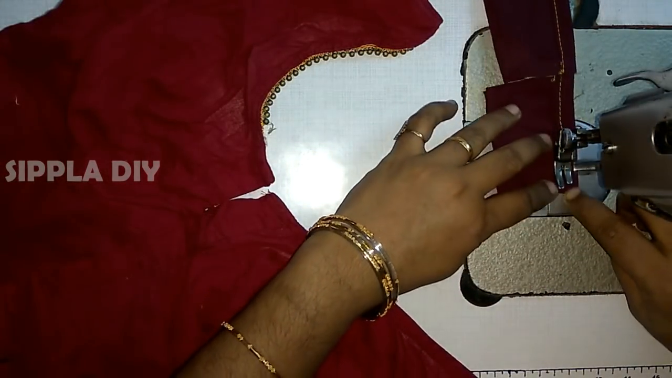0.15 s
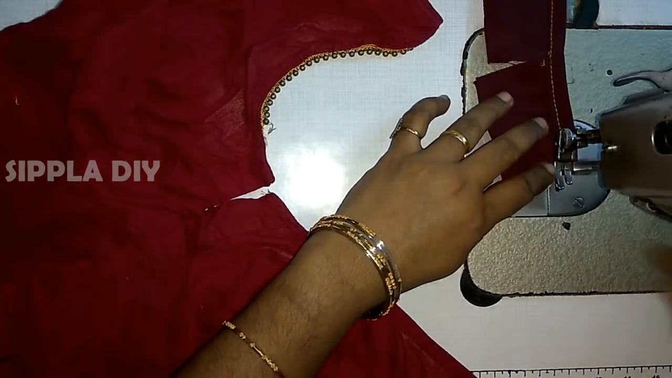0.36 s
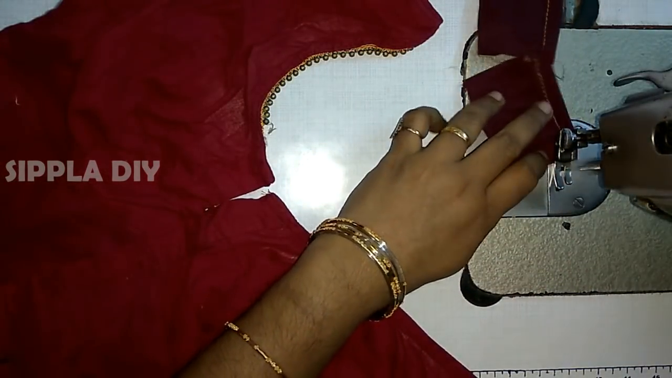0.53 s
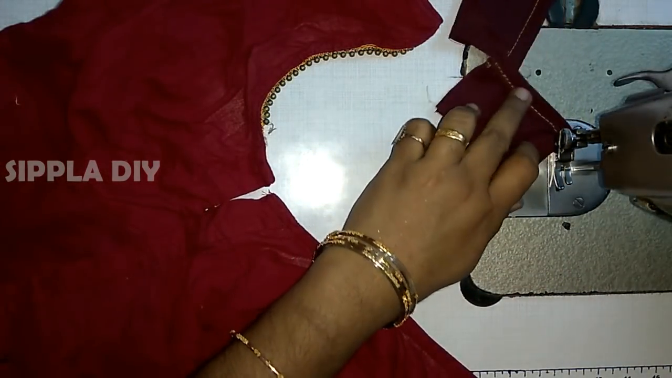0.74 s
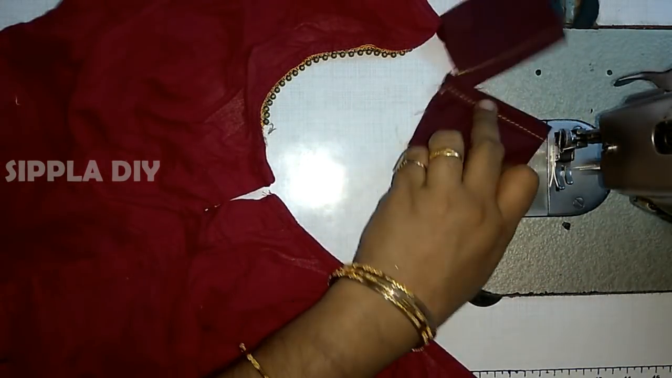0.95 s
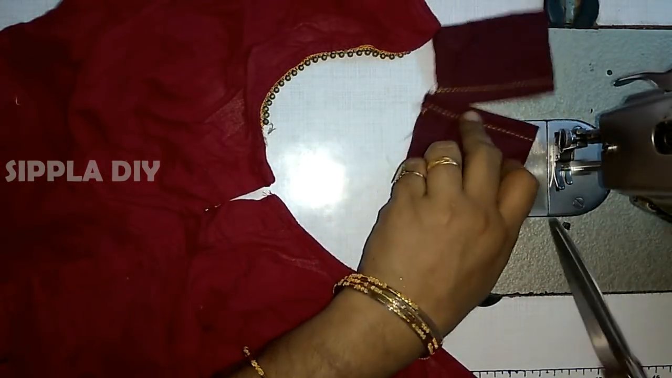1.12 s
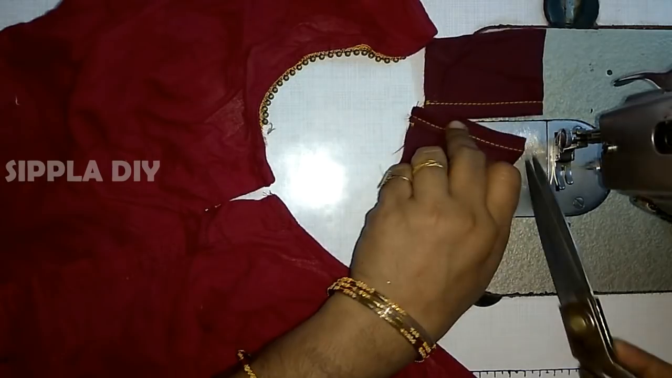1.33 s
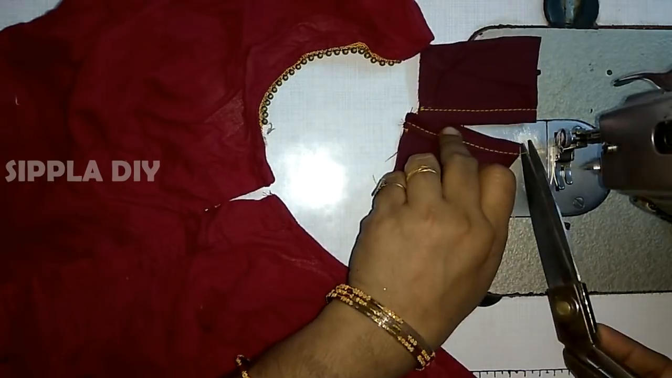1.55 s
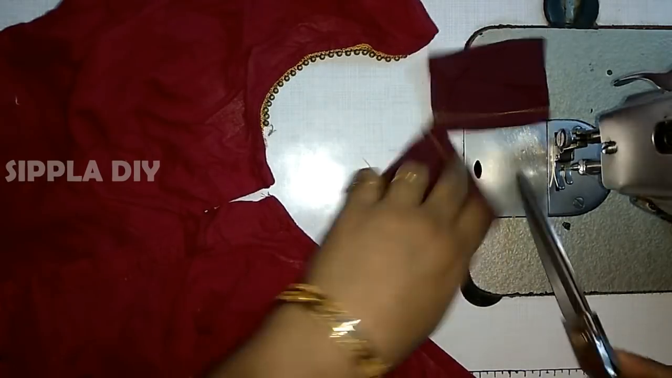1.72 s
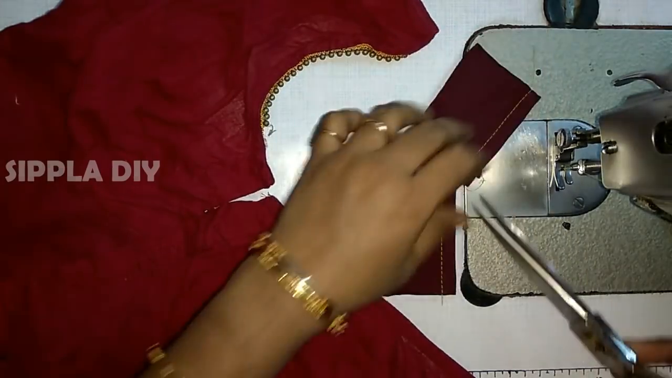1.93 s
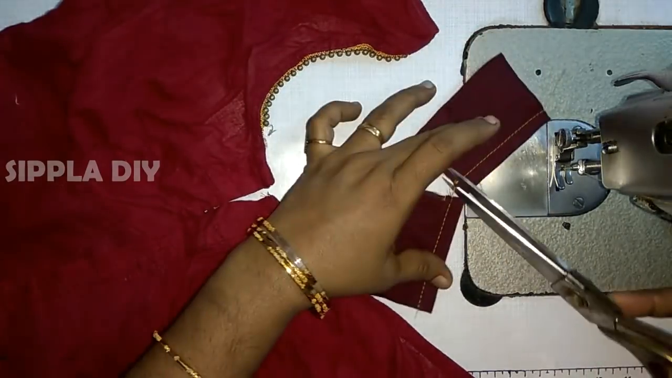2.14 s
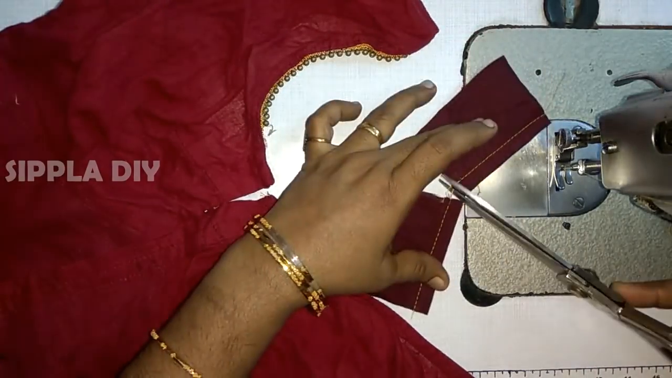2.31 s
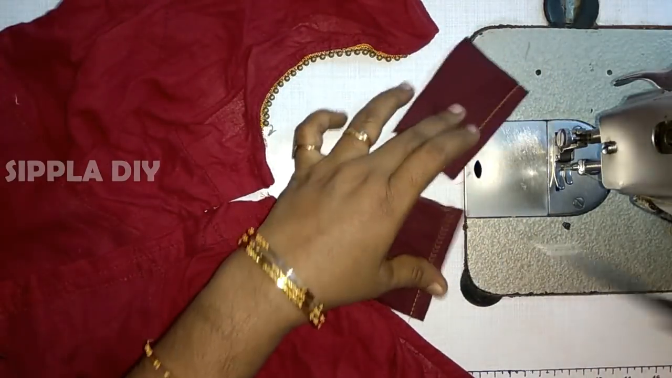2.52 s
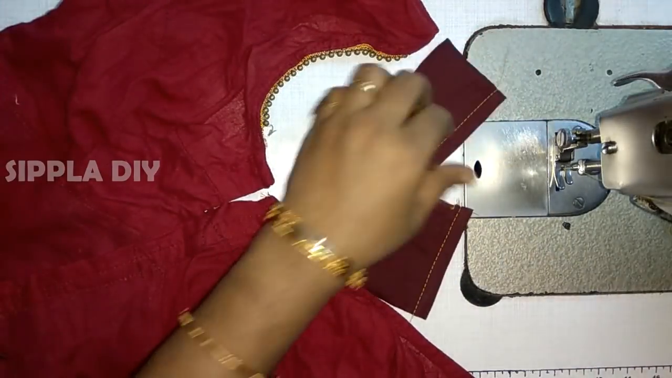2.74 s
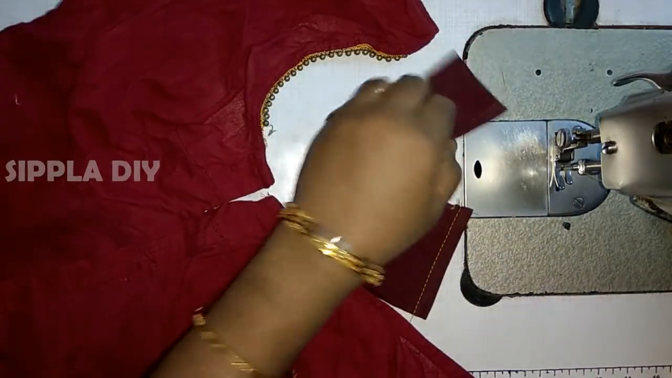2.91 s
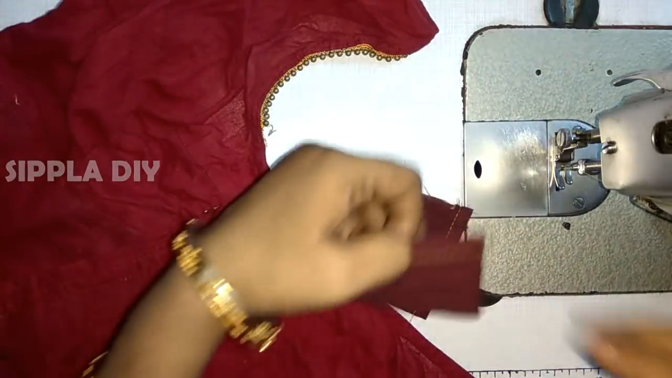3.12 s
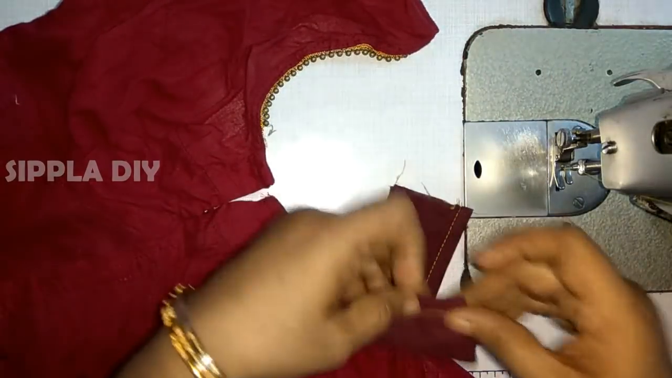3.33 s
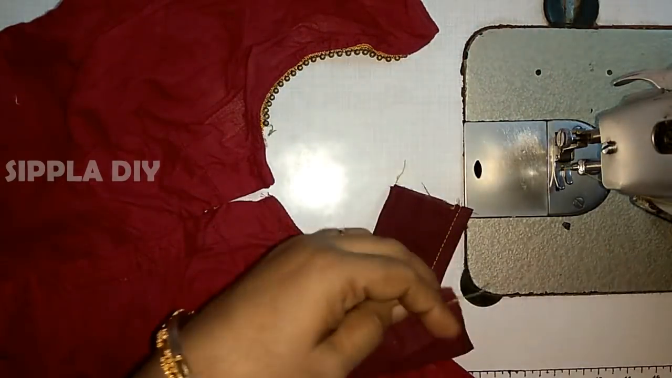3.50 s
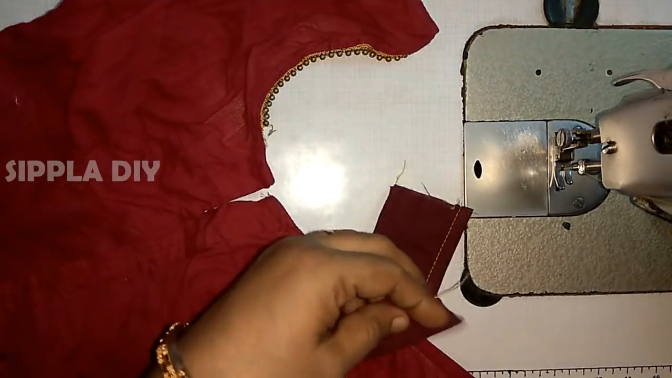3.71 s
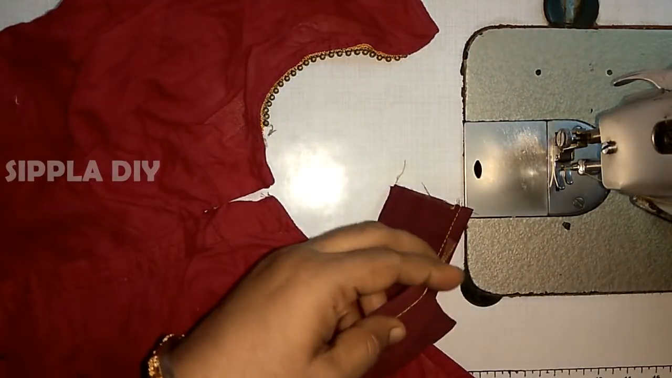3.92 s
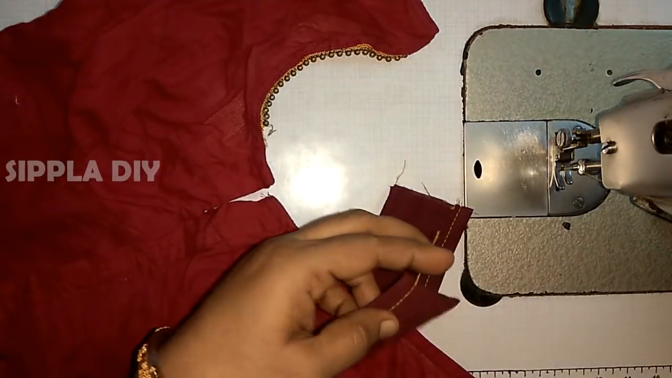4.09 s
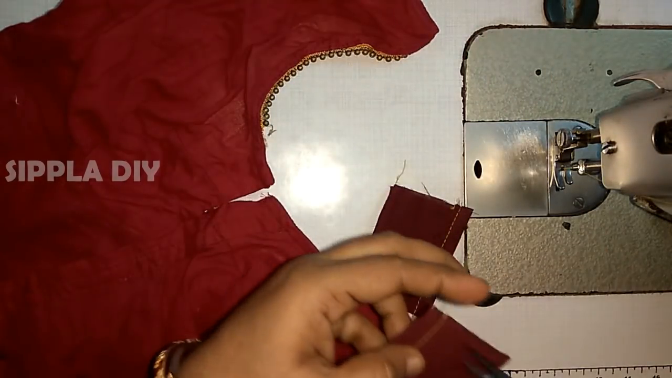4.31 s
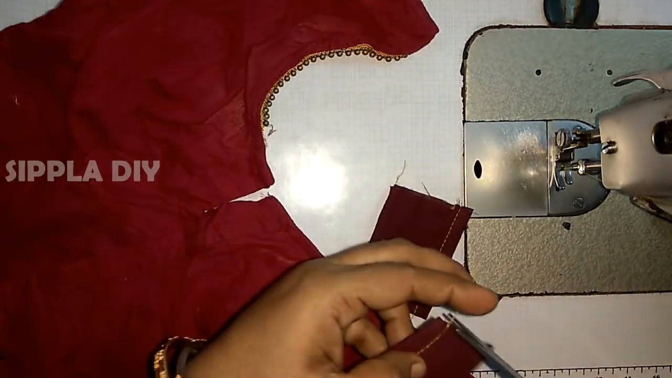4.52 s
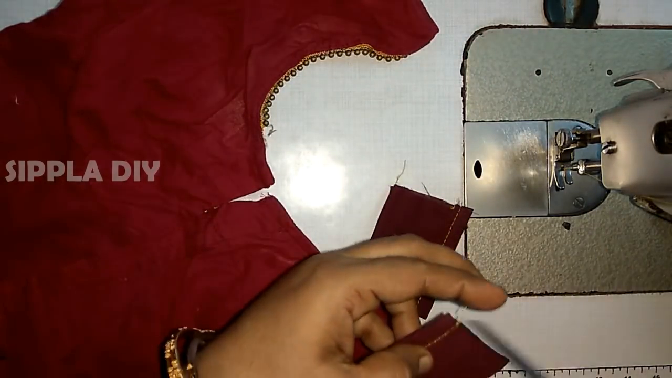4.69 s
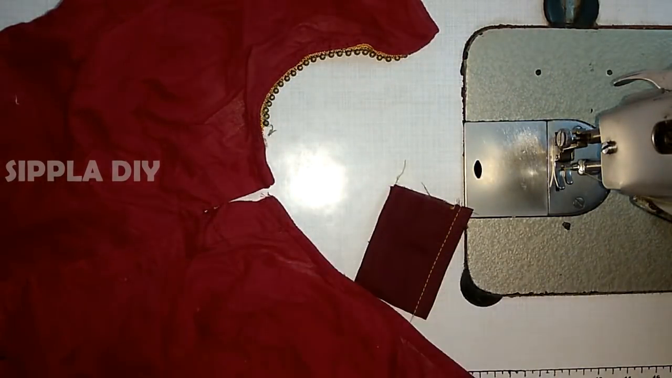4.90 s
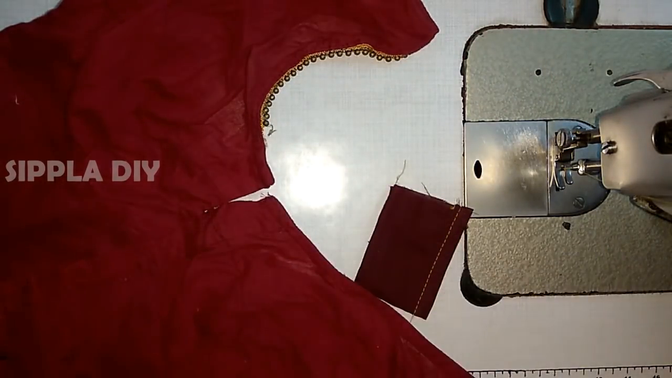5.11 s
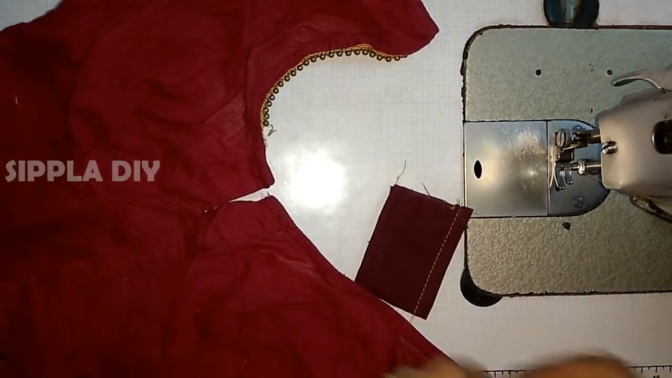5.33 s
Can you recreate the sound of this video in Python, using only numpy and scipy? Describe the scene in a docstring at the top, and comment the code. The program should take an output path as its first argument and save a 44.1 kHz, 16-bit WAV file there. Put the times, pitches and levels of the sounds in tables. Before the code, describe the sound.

A sewing machine clatters through a fast seam, slows and stops, then scissors and hands knock and snip in a small quiet room.

```python
"""A sewing machine on a wooden table runs a seam, slows and stops: hook, needle bar and feed dog clack
in bursts of steel-coloured noise and frame modes, low tones thump the table, and shaft whir runs under.
Blades and cloth slide (grainy noise), scissors and hands knock (noise and modes), a thin whistle sounds
(wavering tone) and scissors snip (ticks and ringing tones), over room tone (murmur and hiss).
A small room answers; the sound is phone-like, little above 7 kHz, its noise unrelated left to right."""
import sys
import numpy as np
from scipy import signal
from scipy.fft import rfft, irfft, next_fast_len
from scipy.io import wavfile
from scipy.ndimage import uniform_filter1d, map_coordinates

SR = 44100
rng = np.random.default_rng(int(sys.argv[2]) if len(sys.argv) > 2 else 0)


def write(x):
    x = np.atleast_2d(x).T
    wavfile.write(sys.argv[1], SR, np.round(np.clip(x, -1, 1) * 32767).astype(np.int16))


N = 240520
T = np.arange(N) / SR
MIRROR_HZ = 8000  # treble just under this comes back mirrored above it

# stitches, timed by the needle bar: needle_s, clack_db (contacts follow it in part), thump_db
STITCHES = [(.0034, -18.5, -29), (0.057, -16, -14), (0.1166, -22, -17), (0.1685, -21.5, -11.5),
            (0.2287, -17.5, -11.5), (0.2894, -20, -13.5), (0.3485, -23, -16), (0.4016, -21, -21),
            (.457, -19, -11.5), (0.513, -18.5, -15.5), (0.573, -22.5, -9.5), (.63, -19, -36),
            (0.6933, -21, -20), (0.755, -21.5, -13.5), (0.811, -19, -24), (0.8668, -23.5, -34),
            (0.908, -33.5, -29), (0.965, -47.5, -17), (1.0395, -23, -13), (1.1096, -21, -16),
            (1.184, -28, -17.5), (1.25, -24.5, -12), (1.318, -27, -12), (1.3935, -19.5, -10),
            (1.483, -25, -27), (1.5807, -21.5, -21), (1.6907, -35.5, -28)]
# state of the run: time_s, steel_whir_db, table_whir_db, clack_body_db, feed_dog_wait_s,
# rebound_db (re thump), hook_lead_s, hook_firmness_db
RUN = [(0, -31.5, -31, -27, 0.025, -23, 0.011, -19), (.3, -32.5, -33, -23, 0.03, -15.5, 0.022, -9.5),
       (.5, -34, -33, -24, 0.029, -13, 0.016, -7), (0.718, -37, -37, -26, 0.025, -5, 0.028, 3.5),
       (0.848, -40.5, -27, -24, 0.025, 12, .016, 6), (1.0, -43, -35, -25, 0.026, 0, 0.011, 1),
       (1.099, -48, -36, -26, .024, 7, 0.02, -3.5), (1.17, -36.5, -33, -26, 0.022, 0.5, 0.012, 6.5),
       (1.321, -40, -36.5, -26, 0.024, -1.5, 0.013, 5), (1.39, -44.5, -40, -30, 0.026, -0.5, 0.013, -2),
       (1.579, -39, -49, -30.5, .036, -1, 0.0052, -14), (1.698, -45.5, -58.5, -36, 0.026, 1, .012, -12.5),
       (1.9, -60, -77, 2, .028, -8, .012, -14)]


def amp(db):
    """Amplitude factor of a level in dB."""
    return 10 ** (np.asarray(db) / 20)


def unit(x):
    """x scaled to rms 1."""
    return x / np.sqrt(np.mean(x ** 2) + 1e-20)


def along(points, hz):
    """Interpolate (Hz, value) points on a log frequency axis."""
    f, v = np.transpose(points)
    return np.interp(np.log(hz + 1), np.log(f + 1), v)


def curves(rows):
    """One value per sample for each column after the time."""
    s, *cols = np.transpose(rows)
    return [np.interp(T, s, c) for c in cols]


def sounding(rows):
    """A gate that opens and closes softly at the ends of a table."""
    return np.clip(np.minimum(T - rows[0][0], rows[-1][0] - T) / 0.013, 0, 1)


def run_state(column, s):
    """One column of the run's state at given times."""
    rows = np.transpose(RUN)
    return np.interp(s, rows[0], rows[column])


def wobble(rate_hz):
    """A smooth random curve, rate_hz knots a second."""
    knots = rng.standard_normal(int(N * rate_hz / SR) + 4)
    return map_coordinates(knots, [T * rate_hz])


def filtered(x, response):
    """x filtered by a response given as a function of frequency."""
    m = next_fast_len(N + SR // 2)
    return irfft(rfft(x, m) * response(np.fft.rfftfreq(m, 1 / SR)), m)[..., :N]


def split(x, hz):
    """The parts of x below and above a frequency."""
    low = filtered(x, lambda f: 1 / (1 + (f / hz) ** 8))
    return low, x - low


def noise(spectrum, level=1, patchy_db=0, span=3):
    """Coloured noise, unrelated left to right; its colour shifts in patches of span x 1.5 ms."""
    z = signal.stft(rng.standard_normal((2, N)), nperseg=128)[2]
    field = uniform_filter1d(rng.standard_normal(z.shape[1:]), size=2, axis=0)
    field = uniform_filter1d(field, size=span, axis=1)
    patchy = unit(signal.istft(z * amp(patchy_db * unit(field)), nperseg=128)[1][:, :N])
    return filtered(level * patchy, lambda hz: unit(amp(along(spectrum, hz)) * (hz < MIRROR_HZ)))


def wood(f):
    """The table's resonances, scaled so that white noise keeps its power."""
    # centre_hz, width_hz, relative_level_db
    resonances = [(60, 410, -18), (181, 125, -2.5), (323.7, 72, 3), (394.4, 93, 0.5), (541.5, 74.5, 0.5),
                  (697, 130, -7.5)]
    r = 0
    for k, (c, w, db) in enumerate(resonances):
        r = r + (-1) ** k * amp(db) * 1j * f * w / (c * c - f * f + 1j * f * w)
    return r / np.sqrt(np.mean(np.abs(r) ** 2))


def shaken_table(level):
    """White noise under an envelope, unrelated left to right, through the table's resonances."""
    return filtered(level * rng.standard_normal((2, N)), wood)


def burst(s, rise_s, t60_s):
    """Power of one contact: a bell-shaped rise, then an exponential fall."""
    u = T - s
    return np.where(u < 0, np.exp(-(u / rise_s) ** 2), amp(-120 * np.abs(u) / t60_s))


def train(times, db, rise_s, t60_s):
    """Amplitude envelope of many alike contacts whose powers add, each peaking 0.4 ms after its time."""
    spikes = np.bincount(np.round(np.asarray(times) * SR).astype(int), amp(2 * np.asarray(db)), N)
    shape = burst(0.0504, rise_s, t60_s)[:SR // 4]
    power = signal.fftconvolve(spikes, shape)[round(.05 * SR):][:N]
    return np.sqrt(np.abs(power))


def ring(modes, times, db, scatter_db, attack_s):
    """Each blow rings the modes at a new pitch and balance, with a new phase in each channel."""
    out, t = np.zeros((2, N + SR)), T[:SR // 5]
    hz, mode_db, t60_s = np.transpose(modes)[..., None, None]
    onset = 1 - np.exp(-t / attack_s)
    for s, level_db in zip(times, db):
        chance = rng.standard_normal((len(modes), 1, 2))
        pitch_hz = hz * (1 + .008 * chance[..., :1])
        decay = amp(mode_db + scatter_db * chance[..., 1:] - 60 * t / t60_s)
        tones = decay * np.sin(2 * np.pi * (pitch_hz * t + rng.random((len(modes), 2, 1))))
        out[:, round(s * SR):][:, :len(t)] += amp(level_db) * tones.sum(axis=0) * onset
    return out[:, :N]


def contacts():
    """Time, treble level and body level of hook, needle bar and feed dog in every stitch."""
    # one value each for hook, needle bar, feed dog: treble_db at average strength
    treble_db = [-27, -20, -24]
    # share of the stitch's strength in dB that each follows
    follows = [0.85, 0.77, 0.27]
    # body_offset_db
    body_offset_db = [-5, 0.5, 2]
    jitter_s, scatter_db = 0.0005, 0.63
    s, clack_db, _ = np.transpose(STITCHES)
    chance = rng.standard_normal((len(s), 3, 3)) * [[1], [.3], [1]]  # needle bar varies least
    offset_s = np.c_[-run_state(column=6, s=s), 0 * s, run_state(column=4, s=s)]
    times = s[:, None] + offset_s + jitter_s * chance[..., 0]
    firm_db = np.c_[run_state(column=7, s=s), 0 * s, 0 * s]
    strength_db = np.outer(clack_db - treble_db[1], follows)
    db = treble_db + firm_db + strength_db + scatter_db * chance[..., 1]
    body_db = run_state(column=3, s=times) + body_offset_db + firm_db + scatter_db * chance[..., 2]
    heard = times > 0
    return times[heard], db[heard], body_db[heard]


def machine():
    """Clacks ring the steel frame, each in its own colour, and shake the table; the whir runs under them."""
    # steel spectrum: frequency_hz, relative_density_db
    steel = [(440, -31), (750, -13.5), (1080, -7.5), (1150, -4), (1230, -11), (1370, -15.5), (1570, -8),
             (2060, -9.5), (2430, -7), (2800, -9.5), (3920, -4.5), (4600, -9.5), (5500, -6), (7000, -17)]
    # modes of arm and bed: pitch_hz, relative_level_db, t60_s
    frame_modes = [(319.4, -0.5, 0.17), (553.7, -4.5, 0.1), (786, -13, 0.039), (1147, -7, .13),
                   (1622, -12, .06), (2270, -12.5, .045), (3680, -11, .035), (5630, -8, .035)]
    frame_db, shake_db = -5.5, -12  # re clack body, re clack treble
    s, db, body_db = contacts()
    stop = np.clip((RUN[-1][0] - T) / 0.044, 0, 1)
    steel_whir, table_whir = stop * amp(curves(RUN)[:2])
    treble = train(s + 0.0024, db, 0.0027, 0.046) + steel_whir
    body = train(s + 0.0026, body_db, 0.0038, 0.065) + steel_whir
    high = split(noise(steel, treble, patchy_db=3.5, span=6), hz=3250)[1]
    deep = split(noise(steel, body, patchy_db=4.5, span=6), hz=3135)[0]
    frame = ring(frame_modes, s, body_db + frame_db, scatter_db=1.5, attack_s=0.0059)
    shake = train(s + 0.0014, db + shake_db, 0.002, 0.039) + table_whir
    return high + deep + frame + shaken_table(shake)


def thumps():
    """Table thumps: decaying low tones of new pitch and phase, a rebound, and a shake of upper modes."""
    # a hand lands on the table: start_s, thump_db
    hand = (4.012, -25)
    lead_s, rebound_s, modes_db = 0.0145, 0.0235, -1  # modes_db re clack body
    out, t = np.zeros((2, N + SR)), T[:SR // 8]
    s, _, db = np.transpose(STITCHES[1:])
    start = s - lead_s
    rebound_db = db + run_state(column=5, s=s)
    blows = [*zip(start, db), *zip(start + rebound_s, rebound_db), hand]
    envelope = (1 - np.exp(-t / 0.0048)) ** 2 * amp(-60 * t / 0.083)
    for at, level_db in blows:
        hz = 158 * np.exp(.1 * rng.standard_normal((2, 1)))
        swing = np.sin(2 * np.pi * (hz * t + rng.random((2, 1))))
        out[:, round(at * SR):][:, :len(t)] += amp(level_db) * swing * envelope
    shake = train(s - .002, run_state(column=3, s=s) + modes_db, 0.0079, 0.069)
    return out[:, :N] + shaken_table(shake)


def room_tone():
    """Low murmur of the house and a thin hiss, both slightly unsteady."""
    # time_s, murmur_db, hiss_db
    levels = [(1.9, -61.5, -67), (2.35, -56.5, -67), (2.8, -54, -63.5), (3.33, -56.5, -63),
              (3.7, -61.5, -69), (4.1, -56, -65.5), (4.6, -60.5, -68.5), (4.9, -56.5, -59),
              (5.45, -55, -72.5)]
    # murmur spectrum: frequency_hz, relative_density_db
    murmur_spectrum = [(15, -41.5), (40, -21.5), (95, -3.5), (124, -11.5), (173, -5.5), (1300, -23.5),
                       (2500, -89)]
    # hiss spectrum: frequency_hz, relative_density_db
    hiss_spectrum = [(650, -43.5), (1100, -11), (1570, -5.5), (2200, -7.5), (2650, -6.5), (3600, -10.5),
                     (5100, -7.5), (5550, -5), (6000, -10.5), (7000, -25.5)]
    low_db, high_db = curves(levels)
    murmur = noise(murmur_spectrum, amp(low_db), patchy_db=2, span=40)
    return murmur + noise(hiss_spectrum, amp(high_db), patchy_db=1.2, span=30)


def slides():
    """Blades and cloth sliding: grainy friction noise swells and fades under each stroke."""
    # peak_s, level_db, rise_s, fall_s, treble_db (re level)
    strokes = [(1.809, -34, 0.09, 0.019, -9), (2.075, -43.5, .04, 0.043, -0.5),
               (2.18, -33.5, 0.02, 0.029, -4.5)]
    # friction spectrum: frequency_hz, relative_density_db
    rasp = [(180, -34.5), (420, -6), (850, -11), (1700, 1), (2250, -8), (2700, -0.5), (4000, -13),
            (5300, -8.5), (7000, -14.5)]
    grainy = noise(rasp, amp(1.5 * wobble(300)), patchy_db=4.0, span=16)
    dull, bright = split(grainy, hz=3450)
    out = 0
    for s, db, rise_s, fall_s, treble_db in strokes:
        swell = np.exp(-np.abs((T - s) / np.where(T < s, rise_s, fall_s)) ** 1.37)
        out = out + swell * amp(db) * (dull + amp(treble_db) * bright)
    return out


def knocks():
    """A sharp blow, a short ring and a softer, grainy rattle after it, in three ranges of the struck things."""
    # start_s, top_db, middle_db, table_db, rattle_db (re blow)
    blows = [(1.7396, -12.5, -27.5, -34.5, -21.5), (2.014, -59, -50.5, -42.5, -11.5),
             (2.178, -44.5, -39.5, -35.5, -15), (2.436, -73, -61, -48, -9), (2.5, -70, -44, -29.5, -12),
             (2.5112, -23, -26, -22.5, -14.5), (2.5683, -43, -40.5, -64, -11.5),
             (2.858, -72, -44, -28, -14), (2.9572, -46, -78, -27, -19.5), (3.0128, -18, -15.5, -21, -12.5),
             (3.0515, -62, -21, -18, -10.5), (3.0765, -36.5, -23.5, -24.5, -20.5),
             (3.9218, -63, -55, -42.5, -8), (4.0112, -77, -51.5, -32.5, -8.5),
             (4.3494, -59.5, -82.5, -59, -7), (5.2064, -33, -34.5, -19, -13.5),
             (5.242, -38.5, -38.5, -23, -17.5), (5.3026, -19.5, -19.5, -24.5, -15.5),
             (5.3294, -11, -14.5, -16, -12.5), (5.361, -36, -26.5, -35, -10.5)]
    # left over right in dB: top, middle, table
    pan_db = [6.5, 2.5, -1.4]
    # top spectrum: frequency_hz, relative_density_db
    top_spectrum = [(1530, -13), (2600, -5.5), (3460, -0.5), (5620, -1.5), (7000, -12.5)]
    # middle spectrum: frequency_hz, relative_density_db
    middle_spectrum = [(470, -25), (800, -8.5), (1010, 1), (1300, -6.5), (1570, -6), (1950, -8.5),
                       (2420, -6), (3200, -6), (4160, -45)]
    # modes of scissors and bed: pitch_hz, relative_level_db, t60_s
    scissor_modes = [(1017, -5, 0.048), (1590, 0.5, 0.036), (2146, -4.5, .04), (2750, -2.5, 0.026),
                     (3790, -1, 0.027), (4870, -5, .03), (5476, -11, .03)]
    blow_t60_s, modes_db = .026, 0.5  # modes_db re middle
    power = np.zeros((3, 2, N))
    grain = amp(3 * wobble(220))
    sides = amp(np.outer(pan_db, [1, -1]))[..., None]  # power: half the pan to each side
    for s, *levels_db, rattle_db in blows:
        near = slice(round((s - .03) * SR), round((s + .4) * SR))
        u = T[near] - s
        rattle = np.clip(u / 0.011, 0, 1) * np.exp(-(u / 0.039) ** 2) * grain[near]
        shape = burst(s + 0.0039, 0.0025, blow_t60_s)[near] + amp(2 * rattle_db) * rattle
        power[..., near] += amp(2 * np.array(levels_db))[:, None, None] * sides * shape
    top, mid, low = np.sqrt(power)
    body = noise(top_spectrum, top, patchy_db=2.0, span=12)
    body = body + noise(middle_spectrum, mid, patchy_db=0.0, span=12)
    s, _, mid_db, *_ = np.transpose(blows)
    body = body + ring(scissor_modes, s + 0.0027, mid_db + modes_db, scatter_db=2.5, attack_s=0.0013)
    return body + shaken_table(low)


def whistle():
    """A short, thin, wavering tone in two pulses, louder on the left."""
    # time_s, mean_pitch_hz, level_db (at a pulse's top, before panning)
    glide = [(4.205, 5900, -58), (4.28, 6020, -61)]
    hz, db = curves(glide)
    pulses = np.sin(np.pi * (T - 4.207) / .034) ** 2
    tone = np.sin(2 * np.pi * np.cumsum(hz + 40 * wobble(200)) / SR)
    return sounding(glide) * amp(db) * pulses * tone * amp([[1.5], [-1.5]])


def snips():
    """Scissor blades meet with a noise tick and ring on in decaying tones of slightly unsteady phase."""
    # time_s, level_db, left_over_right_db
    cuts = [(4.777, -24.5, 5), (5.0552, -37, 7)]
    # blade modes: pitch_hz, relative_level_db, t60_s
    blades = [(1690, -15.5, 0.048), (4190, -3.5, 0.037), (5290, -3.5, 0.088), (5515, -7, 0.082)]
    out, t = np.zeros((2, N + SR)), T[:SR // 4]
    onset = 1 - np.exp(-t / 0.0011)
    for s, db, pan_db in cuts:
        ringing = 0
        for hz, level_db, t60_s in blades:
            drift = np.cumsum(0.135 * rng.standard_normal((2, len(t))), axis=1)
            phase = 2 * np.pi * hz * t + drift
            ringing = ringing + amp(level_db - 60 * t / t60_s) * np.sin(phase)
        tick = 1.1 * amp(-60 * t / 0.0086) * np.diff(rng.standard_normal((2, len(t) + 1)))
        gain = amp(db + np.array([[pan_db], [-pan_db]]) / 2)
        out[:, round(s * SR) - 60:][:, :len(t)] += gain * (ringing + tick) * onset
    return out[:, :N]


def walls(x):
    """The room's answer: a noise tail in which each frequency dies at its own speed."""
    # frequency_hz, t60_s
    decay = [(150, 0.098), (7000, 0.02)]
    hz, t, z = signal.stft(rng.standard_normal((2, SR // 3)), SR, nperseg=256)
    tail = signal.istft(z * amp(-60 * t / along(decay, hz)[:, None]), SR, nperseg=256)[1]
    return signal.fftconvolve(x, tail / np.linalg.norm(tail[0]), axes=1)[:, :N]


def scene():
    """Stitching and handling with the room's answer to them, then whistle and room tone."""
    stitching = machine() + thumps()
    handling = knocks() + snips() + slides()
    answer = walls(amp(-10) * stitching + amp(-21.5) * handling)
    return stitching + handling + answer + whistle() + room_tone()


def record(dry):
    """Phone-like: passes the band under about 7.4 kHz and a faint mirror image of its top, and hisses faintly."""
    # treble roll-off: frequency_hz, gain_db
    passband = [(6900, -1.5), (7500, -14), (7900, -23.5), (8300, -62.5)]
    # mirror image: frequency_hz, gain_db
    image = [(8100, -64), (8500, -16), (9600, -25.5), (10300, -66)]
    hiss_points = [(5000, -100), (7000, -68.5), (14000, -102)]  # frequency_hz, gain_db
    top_hz = 15100
    mirrored = dry * 2 * np.cos(2 * np.pi * 2 * MIRROR_HZ * T)
    direct = filtered(dry, lambda hz: amp(along(passband, hz)))
    both = direct + filtered(mirrored, lambda hz: amp(along(image, hz)))
    hiss = filtered(rng.standard_normal((2, N)), lambda hz: amp(along(hiss_points, hz)))
    return filtered(both + hiss, lambda hz: hz < top_hz)


dry = scene()
out = record(dry)
write(out)
```